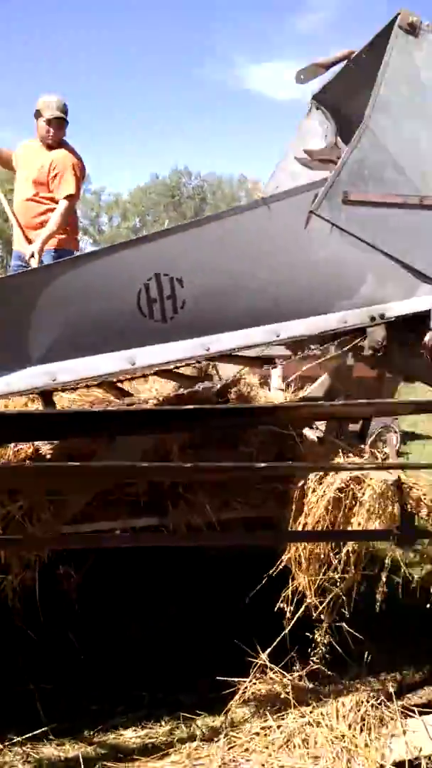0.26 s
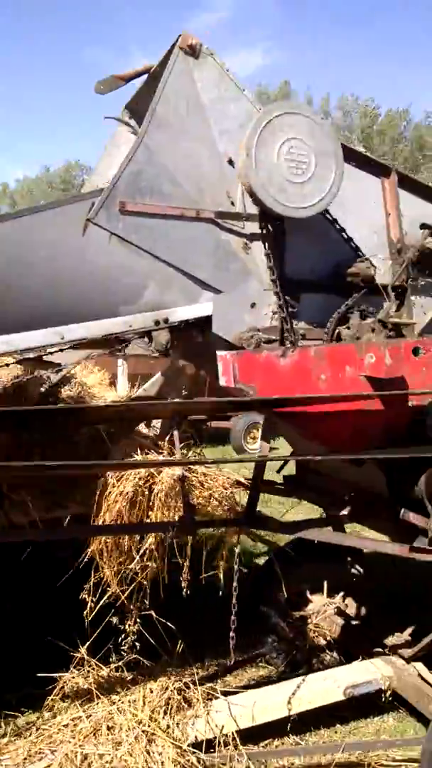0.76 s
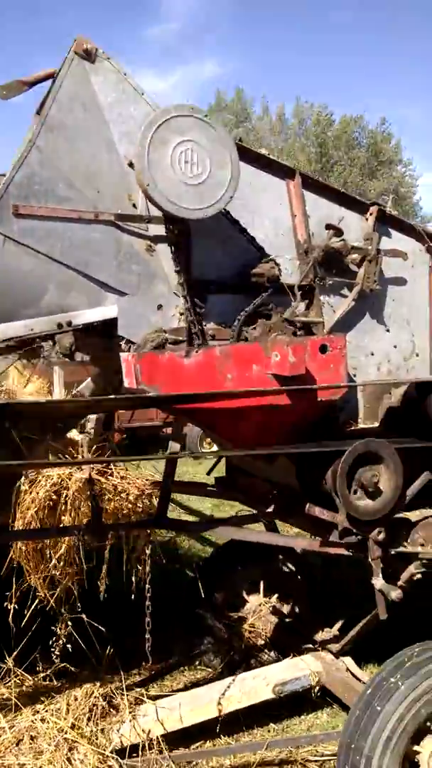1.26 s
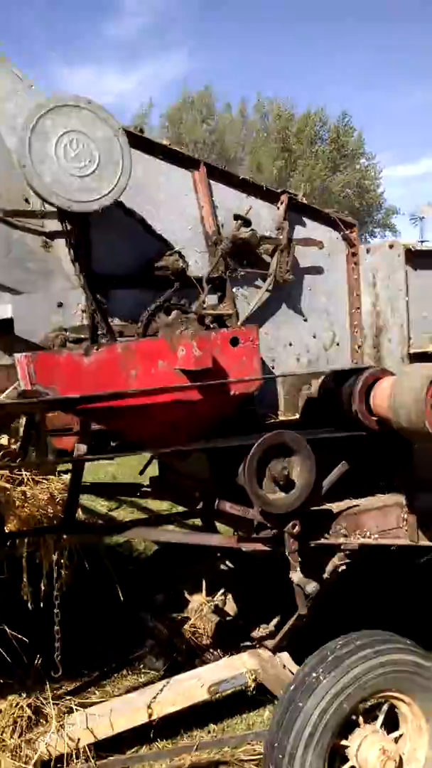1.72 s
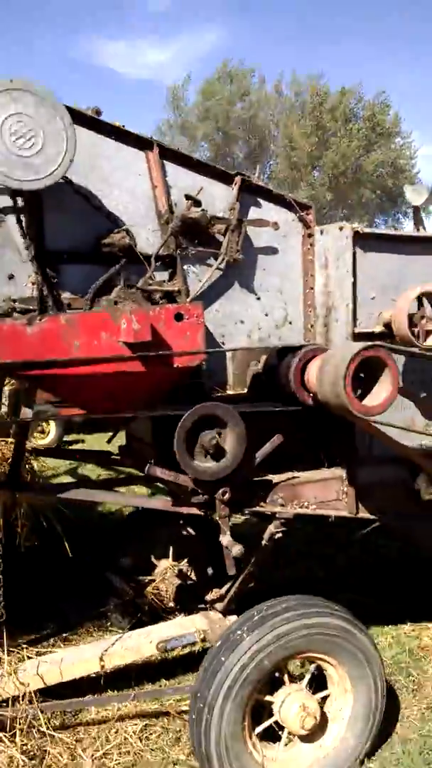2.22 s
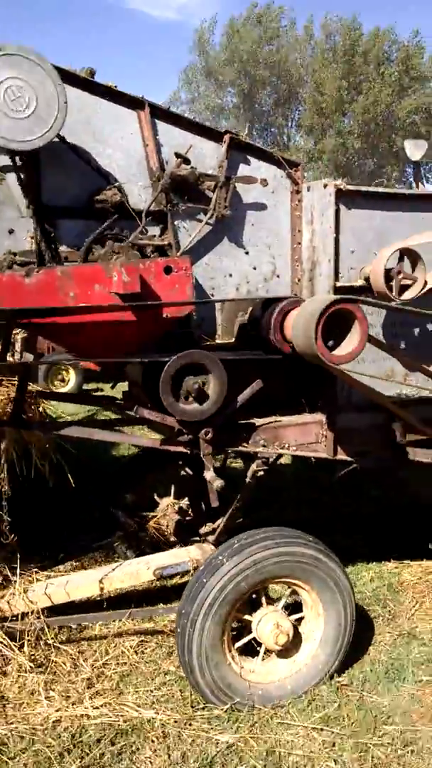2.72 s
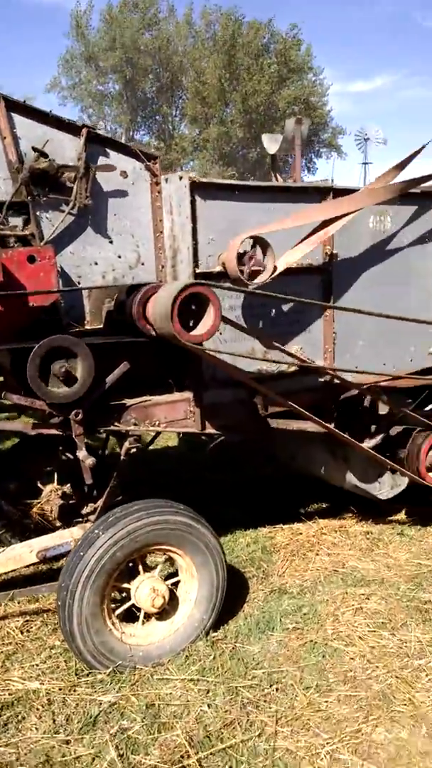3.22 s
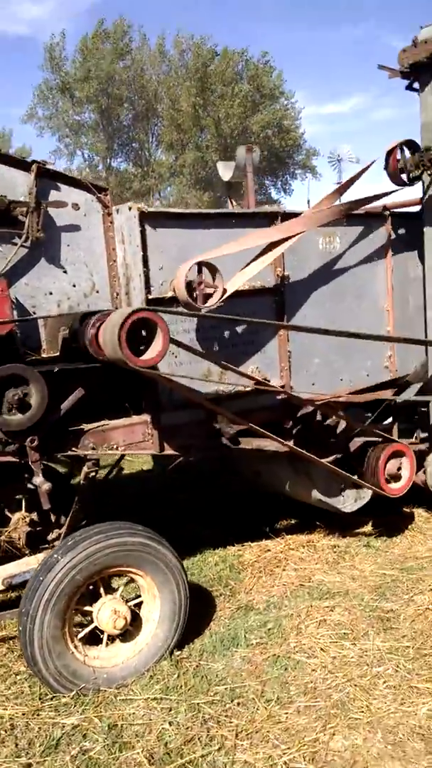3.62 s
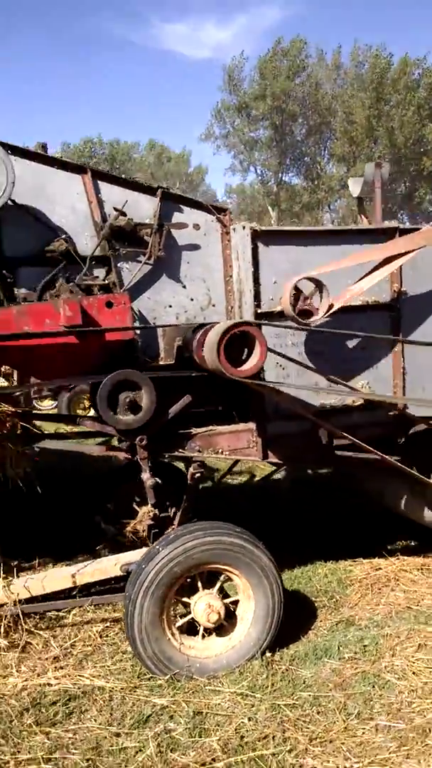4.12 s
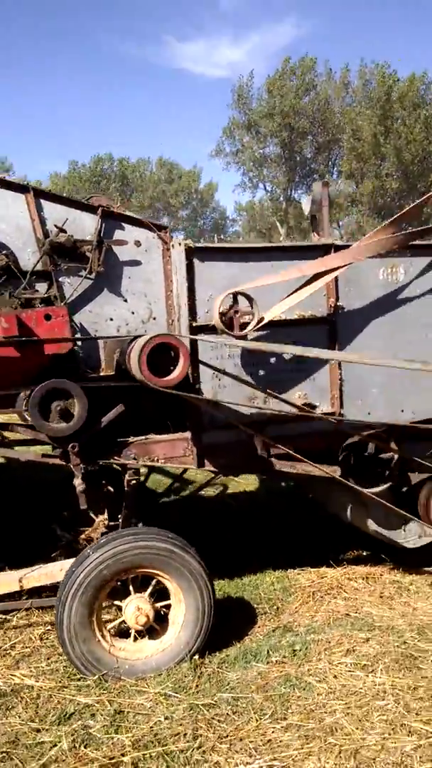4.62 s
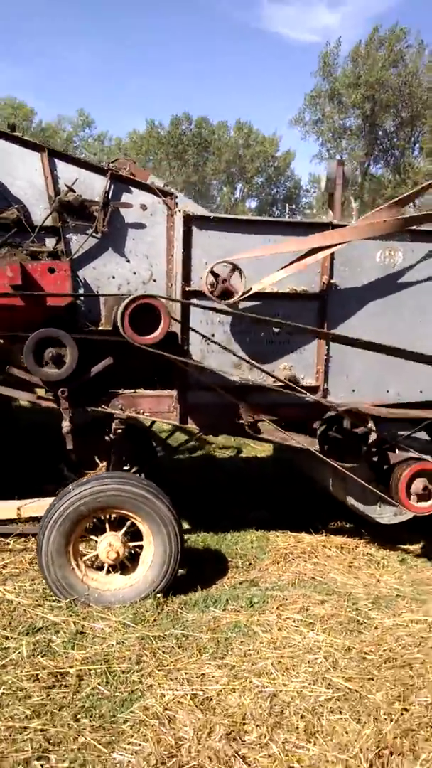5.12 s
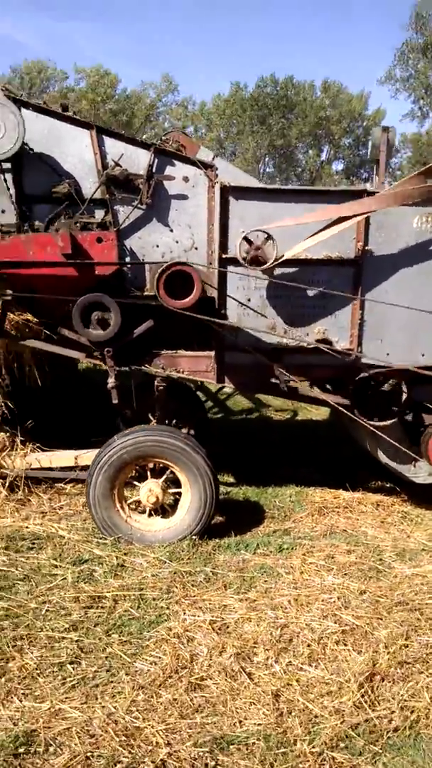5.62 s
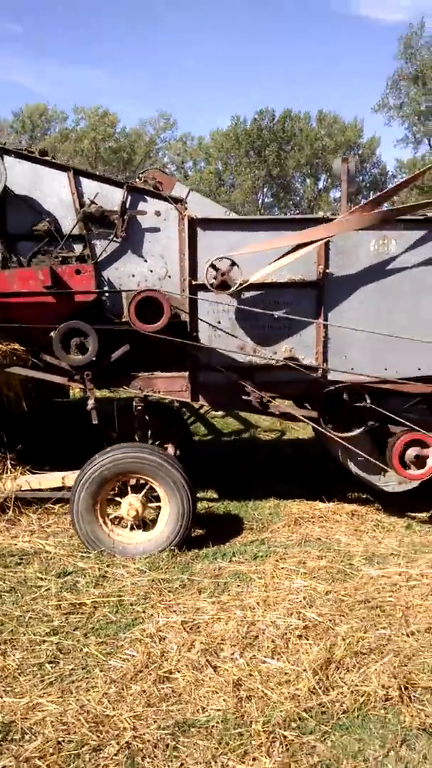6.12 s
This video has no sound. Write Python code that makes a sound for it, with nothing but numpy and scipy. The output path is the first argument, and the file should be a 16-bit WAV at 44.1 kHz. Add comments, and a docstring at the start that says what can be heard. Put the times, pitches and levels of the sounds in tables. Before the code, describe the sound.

A big belt-driven threshing machine runs close by outdoors: rough sheet-metal roar, bright chaff hiss, rattling tin and a low shaft hum. Wind pops hit the handheld stereo microphone early, and the machine dips and swells back. Around four seconds a heavy bundle chokes it with a sharp squeal, hammering and a short groan as the hum sags; thumps and pings follow, with more wind near the end.

```python
"""Threshing machine choking on a bundle

A belt-driven threshing machine runs outdoors beside a hand-held camera: filtered noise makes the sheet-metal din,
chaff hiss and rattling panels, sines the shaft hum, pings and ringing tin. Bundles thump; a heavy one slugs the
cylinder, which groans, hammers and sags in speed. Wind pops push the two microphone ports in opposite directions
and make the gain control duck the whole machine, which then swells back.
"""
import sys
import numpy as np
from scipy import signal
from scipy.io import wavfile
from scipy.ndimage import uniform_filter1d

SR = 44100
rng = np.random.default_rng(int(sys.argv[2]) if len(sys.argv) > 2 else 0)


def output_pcm(signal):
    """Save a mono or channel-first signal as 16-bit PCM at the path in sys.argv[1].

    Samples are clipped to [-1, 1] before scaling.
    """
    pcm = np.clip(np.atleast_2d(signal).T, -1, 1) * 32767
    wavfile.write(sys.argv[1], SR, np.round(pcm).astype(np.int16))


N = 280476  # samples

# how hard the machine is fed: (time [s], sheet-metal din [dB], chaff hiss [dB])
STRAW_LOAD = [(0, -20.5, -22.5), (.3, -21.5, -22.5), (.65, -18, -18), (1, -19.5, -17.5), (1.4, -18, -18.5),
              (1.9, -18, -18), (2.1, -20.5, -21), (2.5, -22, -20.5), (3, -22.5, -19.5),
              (3.45, -23.5, -20.5), (3.9, -21, -20), (4.3, -23.5, -22.5), (4.75, -24.5, -22.5),
              (5.05, -19, -19), (5.35, -24.5, -21.5), (5.85, -21, -21), (6.05, -24, -24.5),
              (6.36, -25.5, -23.5)]
# rattle of the feeder housing, strongest while the camera faces it: (time [s], level [dB])
FEEDER_LEVEL = [(0, 0), (.8, 3.5), (1.2, 10), (2, 4.5), (2.6, 4), (3.4, -0.5), (4.2, 0), (5, 1), (5.8, -3),
                (6.36, 3)]
BARS_PER_HUM = 3.5  # cylinder bars passing in one cycle of the shaft hum
GROAN_START_S, GROAN_RISE_S, GROAN_HOLD_S, GROAN_RELEASE_S = 3.89, 0.04, 0.25, 0.04


def amp(db):
    """Turns dB into gain."""
    return 10 ** (np.asarray(db) / 20)


def evened(x):
    """Scales a signal to rms 1."""
    return x / np.sqrt(np.mean(x ** 2) + 1e-20)


def read(points, hz):
    """Reads a curve over frequency on a logarithmic axis."""
    f, value = np.transpose(points)
    return np.interp(np.log(hz + 1), np.log(f + 1), value)


def column(table, order):
    """Reads one column of a time table at every sample."""
    rows = np.array(table)
    return np.interp(np.arange(N) / SR, rows[:, 0], rows[:, order])


def add(mix, s, sound):
    """Mixes a sound in at time s, cut at the end of the scene."""
    part = mix[..., round(s * SR):][..., :sound.shape[-1]]
    part += sound[..., :part.shape[-1]]


def ramp(start_s, length_s):
    """Climbs from 0 to 1."""
    return np.clip((np.arange(N) / SR - start_s) / length_s, 0, 1)


def drift(per_s):
    """Low-passed chance of rms 1; per_s is the cutoff in Hz."""
    low_pass = signal.butter(2, per_s, fs=SR, output="sos")
    settled = signal.sosfilt(low_pass, rng.standard_normal(N + SR))[SR:]
    return evened(settled)


def rush(spectrum, patchy_db, flicker_db, size=512):
    """Two unrelated noises that share drifting patches and a flicker across all bands."""
    frames, hz = 4 * N // size + 5, np.fft.rfftfreq(size, 1 / SR)
    a, b, c, d, patches = rng.standard_normal((frames, len(hz), 5)).T
    patches = evened(uniform_filter1d(uniform_filter1d(patches, size=8, axis=0), size=8, axis=1))
    flicker = evened(uniform_filter1d(rng.standard_normal(frames), size=5))
    level_db = read(spectrum, hz)[:, None] + patchy_db * patches + flicker_db * flicker
    bins = np.array([a + 1j * b, c + 1j * d]) * amp(level_db)
    return evened(signal.istft(bins, nperseg=size, noverlap=3 * size // 4)[1][:, :N])


def narrow_band(order, low_hz, top_hz):
    """Band-pass filter in second-order sections."""
    return signal.butter(order, [low_hz, top_hz], "bandpass", fs=SR, output="sos")


def speed():
    """Shaft hum in Hz: steady, dragged down by the heavy bundle, held low a moment, then regained."""
    run_hz, sag_hz = 57.52, 8.8
    slug_s, sag_s, held_s, regain_s = 3.895, 0.091, 0.408, 0.843
    since = np.maximum(np.arange(N) / SR - slug_s, 0)
    return run_hz - sag_hz * (1 - np.exp(-since / sag_s)) * (1 - ramp(slug_s + held_s, regain_s))


def turns():
    """Cycles of the shaft hum so far, wavering a little in speed."""
    return np.cumsum(speed() * (1 + 0.004 * drift(per_s=2.75))) / SR


def straw_db(order, surge_share, shake_db):
    """Level of one layer: slow load, surges of straw and the toss of the straw racks."""
    # mouthfuls of straw surging through: (time [s], rise of the din [dB])
    mouthfuls = [(.33, 1.5), (2.51, 3), (2.76, 2), (3.26, 1.5), (3.6, 1), (4.01, 4), (4.5, 2), (4.94, 2),
                 (5.44, 3.5), (5.61, 2)]
    surge_s = 0.052
    hums_per_shake, shake_turn = 10, 0.83  # one toss in so many hum cycles; its phase in turns
    t = np.arange(N) / SR
    surges = sum(db * np.exp(-((t - s) / surge_s) ** 2) for s, db in mouthfuls)
    shake = np.cos(2 * np.pi * (np.cumsum(speed()) / SR / hums_per_shake - shake_turn))
    return column(STRAW_LOAD, order=order) + surge_share * surges + shake_db * shake


def chaff_db():
    """Level of the chaff, which takes a smaller share of each surge than the din."""
    return straw_db(order=2, surge_share=0.73, shake_db=0.6)


def median_chaff_db():
    """Middle value of the chaff load table."""
    return np.median(np.array(STRAW_LOAD)[:, 2])


def groan(start_s, mutter_db, groan_db, sag_db_per_s):
    """Envelope of the cylinder bars: a mutter, then attack, sagging hold and release."""
    mutter_rise_s = 0.1
    hold_start_s = GROAN_START_S + GROAN_RISE_S
    held_db = groan_db + sag_db_per_s * GROAN_HOLD_S * ramp(hold_start_s, GROAN_HOLD_S)
    attack = ramp(GROAN_START_S, GROAN_RISE_S) ** 2
    mutter = amp(mutter_db) * ramp(start_s, mutter_rise_s)
    release = (1 - ramp(hold_start_s + GROAN_HOLD_S, GROAN_RELEASE_S)) ** 2
    return (mutter * (1 - attack) + amp(held_db) * attack) * release


def din():
    """The sheet-metal body roars: shaped noise, stirred by the clatter of loose parts."""
    # tone of the sheet metal: (frequency [Hz], relative density [dB per Hz])
    metal_spectrum = [(20, -31), (45, 0), (110, 0.5), (190, 0), (400, -4), (620, -1.5), (730, -2.5),
                      (830, -7), (980, -7), (1100, -4.5), (1350, -8), (1600, -9.5), (2100, -10.5),
                      (2600, -13), (3000, -11), (3500, -21.5), (6000, -29)]
    knocks = amp(1.5 * np.minimum(rng.exponential(1, N), 4)) * (rng.random(N) < 60 / SR)  # 60 a second
    clatter = signal.oaconvolve(knocks, np.exp(-np.arange(2000) / 520.0))[:N]
    level = amp(straw_db(order=1, surge_share=1.0, shake_db=0.5))
    roar = rush(metal_spectrum, patchy_db=0.58, flicker_db=0.65, size=1024)
    return level * (1 + 0.2 * evened(clatter)) * roar


def chaff(shaft):
    """Straw and grain hiss in the shakers, throbbing with each chain link; single kernels tick on the tin."""
    # tone of the chaff: (frequency [Hz], relative density [dB per Hz])
    chaff_spectrum = [(1500, -25), (3300, -6), (4200, -4.5), (4700, -2), (5300, 4.5), (6000, -4.5),
                      (7200, 1.5), (8500, -0.5), (10500, 2.5), (12000, 0.5), (14500, -0.5), (15500, -7.5)]
    links_per_hum = 0.84  # chain links passing in one cycle of the hum
    links = np.exp(-((links_per_hum * shaft) % 1) / 0.56)
    kernels = amp(3.5 * np.minimum(rng.exponential(1, N), 5)) * (rng.random(N) < 500 / SR)  # 500 a second
    ticks = signal.oaconvolve(kernels, np.exp(-np.arange(300) / 16.0))[:N]
    beat = 1 + 0.49 * links + 0.14 * evened(ticks)
    return amp(chaff_db()) * beat * rush(chaff_spectrum, patchy_db=1.5, flicker_db=0.7)


def tinkle():
    """Kernels and loose rivets ring small patches of tin, each a decaying sine at its own pitch."""
    patches, low_hz, top_hz = 30, 298.2, 13490
    hits_per_s, spread_db, level_db = 400, 3, -28.5
    db_per_octave, ring_cycles = -0.9, 130  # ring_cycles scales the decay time
    hits = amp(spread_db * np.minimum(rng.exponential(1, N), 4)) * (rng.random(N) < hits_per_s / SR)
    patch, t, out = rng.integers(0, patches, N), np.arange(1200) / SR, np.zeros(N)
    for k, hz in enumerate(np.geomspace(low_hz, top_hz, patches)):
        decay = np.exp(-t * np.sqrt(hz * 6000) / ring_cycles)
        ring = np.sin(2 * np.pi * hz * t) * decay * np.minimum(t / 0.0017, 1)
        fade_out = np.cos(np.pi / 2 * t / t[-1])
        ring = ring * fade_out * amp(db_per_octave * np.log2(hz / low_hz))
        out += signal.oaconvolve(hits * (patch == k), ring)[:N]
    load_db = column(STRAW_LOAD, order=2) - median_chaff_db()
    # only the first of the two sounds that ports() blends
    return amp(level_db + load_db) * evened(out) * np.array([[1], [0]])


def panels():
    """Loose panels ring in narrow bands, in bursts that follow the load; both ports hear mostly the same ring."""
    # ringing panels: (center [Hz], width [Hz], base level [dB], left minus right [dB], burstiness [dB],
    # share that follows the feeder [ratio])
    panel_rings = [(185.4, 43.6, -33.5, -4, 2, -0.12), (349.4, 78, -45.5, 2, -0.5, 1.6),
                   (2135, 59, -47.5, -9, 7, -0.24), (6610, 330, -37, -11.5, 2.5, -0.25)]
    hush_db = -6 * groan(0, -99, 0, 0)  # the panels fall quiet while the cylinder groans
    out = np.zeros((2, N))
    for hz, width, db, pan_db, burst_db, feeder_share in panel_rings:
        both, *own = rng.standard_normal((3, N))
        ring = signal.sosfilt(narrow_band(4, hz - width / 2, hz + width / 2), both + 0.27 * np.array(own))
        level_db = db + burst_db * drift(per_s=20.2) + feeder_share * column(FEEDER_LEVEL, order=1)
        out += evened(ring) * amp(level_db + hush_db) * amp([[pan_db / 2], [-pan_db / 2]])
    return out * amp(chaff_db() - median_chaff_db())


def feeder():
    """The feeder housing rattles: a narrow band of noise in quick bursts within longer bouts."""
    center_hz, width_hz, level_db = 2870, 380, -42
    band = narrow_band(3, center_hz - width_hz / 2, center_hz + width_hz / 2)
    ring = evened(signal.sosfilt(band, rng.standard_normal((2, N))))
    load_db = column(STRAW_LOAD, order=2) - median_chaff_db()
    bursts_db = 3 * drift(per_s=33.0) + 3.5 * drift(per_s=15.0)
    return ring * amp(level_db + column(FEEDER_LEVEL, order=1) + load_db + bursts_db)


def hum(shaft):
    """Shaft hum: harmonics locked to the shaft's turning, stronger at the right port."""
    # harmonics: (multiple of the hum [ratio], relative level [dB])
    hum_harmonics = [(1, -1), (2, -13)]
    # swell of the hum, before the overall gain of the tones: (time [s], level [dB])
    hum_level = [(0, -30), (.35, -21), (.7, -19.5), (1.05, -19.5), (1.4, -20.5), (1.75, -18.5), (2, -24),
                 (2.75, -25), (3.15, -20.5), (3.35, -28.5), (3.87, -23.5), (3.97, -39), (4.12, -21),
                 (4.38, -39), (4.55, -29), (4.8, -34), (5.04, -25.5), (5.7, -23.5), (6, -24), (6.36, -31)]
    port_phase = np.array([[1.1], [0]])  # radians
    tone = sum(amp(db) * np.sin(2 * np.pi * k * shaft + port_phase) for k, db in hum_harmonics)
    throb_db = 1.2 * drift(per_s=14)
    return tone * amp(column(hum_level, order=1) + throb_db) * amp([[-11], [0]])


def pings():
    """Short metal pings: each is a brief wavering tone; the highest smear into a squeak."""
    # pings and squeaks, before the port blend: (time [s], peak level [dB], frequency [Hz])
    metal_pings = [(0.14, -21, 6840), (2.122, -17, 11400), (2.439, -24, 6600), (2.749, -11.5, 6620),
                   (2.776, -15, 11550), (2.85, -21, 9000), (3.299, -10.5, 10560), (3.965, -11, 9700),
                   (3.974, -9, 11200), (3.978, -12, 12000), (3.988, -0.5, 11550), (4.489, -13, 9660),
                   (4.497, -20, 2540), (4.609, -12.5, 6580), (4.756, -18, 11100), (4.879, -17, 6750),
                   (4.933, -19, 6500), (5.091, -20, 11000), (5.24, -20, 2140), (5.835, -16, 11100),
                   (5.953, -10, 11150)]
    ping_s = 0.015
    out = np.zeros((2, N))
    for s, db, hz in metal_pings:
        waver = uniform_filter1d(rng.standard_normal((2, 1500)), size=60)[:, :round(ping_s * SR)]
        wavering_hz = hz * (1 + 0.38 * (hz / 11000) ** 2 * waver)
        tone = np.sin(2 * np.pi * np.cumsum(wavering_hz, axis=1) / SR)
        add(out, s, amp(db) * tone * np.hanning(tone.shape[1]))
    return out


def wind():
    """Pops push the two ports in opposite directions, then swing back; a low buffeting lies under them."""
    # wind pops, before decay and filtering: (time [s], push [dB], direction [sign])
    wind_pops = [(.4096, 2, 1), (.4195, 10, 1), (.4555, 16, 1), (.4632, 17, -1), (.5054, 14, 1),
                 (.5455, 15, 1), (.6363, 15, 1), (.6665, 10, 1), (.6865, 12.5, 1), (.6944, 13.5, 1),
                 (4.2692, -2, 1), (5.8754, 6, 1), (5.8838, 7, 1), (5.8924, 15.5, 1), (5.9356, 6.5, 1)]
    rise_s, push_fall_s, pull_fall_s = 0.0008, 0.0017, 0.0055
    lead_s = 0.00045  # a pop reaches the right port first
    out, t = np.zeros(N), np.arange(2000) / SR
    for s, db, direction in wind_pops:
        fall_s = push_fall_s if direction > 0 else pull_fall_s
        push = (1 - np.exp(-(t / rise_s) ** 2)) * np.exp(-t / fall_s)
        add(out, s, direction * amp(db) * push)
    out = signal.sosfilt(signal.butter(1, 14, "highpass", fs=SR, output="sos"), out)  # the swing back
    buffet = amp(-44.0 + 1.8 * drift(per_s=3.2)) * drift(per_s=30)
    both = np.array([out, np.roll(out, -round(lead_s * SR))]) + buffet
    return both * amp([[-1.2], [1.2]]) * [[1], [-1]]


def bundles():
    """Bundles strike the cylinder: a crunch of band-passed cracks and a decaying ring of the frame."""
    # strikes, before the port blend: (time [s], length [s], crunch [dB], top of the crunch [Hz], frame ring [dB])
    strikes = [(1.799, .03, -31, 400, -33), (2.553, 0.035, -23.5, 500, -34), (2.66, 0.042, -35, 400, -31),
               (3.285, 0.03, -22.5, 900, -24), (3.572, 0.031, -22, 900, -28), (3.63, .025, -23, 850, -29),
               (3.76, 0.033, -24, 900, -27), (3.885, 0.043, -22, 150, -25), (3.949, 0.029, -11, 750, -22),
               (4.268, 0.035, -19.5, 450, -19), (4.417, 0.016, -20, 465, -16),
               (4.495, 0.029, -29, 800, -27), (4.543, 0.026, -22, 497, -15), (4.677, 0.027, -16, 1180, -17),
               (4.797, 0.035, -22.5, 800, -17), (4.93, 0.03, -23, 905, -18), (5.04, 0.022, -30, 400, -23),
               (5.176, 0.027, -20.5, 600, -28), (5.222, 0.04, -19, 1476, -19),
               (5.408, 0.017, -22, 500, -22), (5.582, 0.017, -17.5, 1010, -22),
               (5.772, 0.02, -21, 704, -37), (5.815, .02, -24, 700, -28)]
    # modes of the frame: (frequency [Hz], relative level [dB], decay time [s])
    frame_modes = [(63, 2.5, 0.014), (319.5, 2, 0.0081), (632, -6.5, 0.0087)]
    out, t = np.zeros((2, N)), np.arange(4000) / SR
    thud = sum(amp(db) * np.sin(2 * np.pi * hz * t) * np.exp(-t / fall_s) for hz, db, fall_s in frame_modes)
    thud = thud * np.minimum(t / 0.0018, 1)
    for s, length_s, crunch_db, top_hz, ring_db in strikes:
        snaps = rng.standard_normal((2, round(length_s * SR))) ** 3  # stalks snap in sharp cracks
        crunch = evened(signal.sosfilt(narrow_band(2, 60, top_hz), snaps))
        add(out, s, amp(crunch_db) * crunch * signal.windows.tukey(snaps.shape[1], 0.35))
        add(out, s, amp(ring_db) * thud[None])
    return out


def clanks():
    """The tin housing clanks: band-passed noise with a quick onset and an exponential fall."""
    # clanks, before the envelope and port blend: (time [s], noise level [dB])
    housing_clanks = [(2.4927, -26), (3.1594, -20), (3.9474, -16), (3.9789, -18), (4.497, -34),
                      (5.241, -32), (5.5994, -30), (5.7848, -19)]
    fall_s = 0.038
    out, t = np.zeros((2, N)), np.arange(3000) / SR
    band = narrow_band(3, 1930, 3000)
    for s, db in housing_clanks:
        clank = evened(signal.sosfilt(band, rng.standard_normal((2, len(t)))))
        add(out, s, amp(db) * clank * np.minimum(t / 0.00086, 1) * np.exp(-t / fall_s))
    return out


def cylinder_bars(shaft):
    """The cylinder bars passing the grate mutter, then groan in a rough tone locked to the shaft."""
    # overtones: (multiple of the bar rate [ratio], relative level [dB])
    bar_overtones = [(2, 0), (3, -7), (4, -9), (5, -8), (6, -6)]
    bar_turns = BARS_PER_HUM * shaft + 0.02 * drift(per_s=40)  # straw makes the bars land unevenly
    overtones = sum(amp(db) * np.sin(2 * np.pi * k * bar_turns) for k, db in bar_overtones)
    bars = groan(3.45, mutter_db=-38, groan_db=-20, sag_db_per_s=-8) * np.sin(2 * np.pi * bar_turns)
    bars = bars + groan(3.77, mutter_db=-30, groan_db=-20.5, sag_db_per_s=-30) * overtones
    return bars * amp(1.6 * drift(per_s=35)) * amp([[-2.5], [1.5]])


def hammering(shaft):
    """Cracks of noise, one for each bar that meets the heavy bundle, swelling and dying away."""
    start_s, rise_s, fall_s, level_db = 3.915, 0.024, 0.042, -13.5
    crack_share = 0.38  # decay of a crack as a share of the bar spacing
    since = np.arange(N) / SR - start_s - rise_s
    swell = ramp(start_s, rise_s) ** 2 * np.exp(-np.maximum(since, 0) / fall_s)
    cracks = np.exp(-((BARS_PER_HUM * shaft) % 1) / crack_share) * rng.standard_normal((2, N))
    return amp(level_db) * swell * evened(signal.sosfilt(narrow_band(2, 200, 1250), cracks))


def whine():
    """A faint sine bends up and falls while the shaft is dragged down."""
    # path of the whine, before the port levels: (time [s], frequency [Hz], level [dB])
    whine_path = [(4.05, 900, -60), (4.1, 930, -36), (4.18, 985, -35), (4.23, 900, -32), (4.3, 770, -33),
                  (4.37, 700, -60)]
    tone = np.sin(2 * np.pi * np.cumsum(column(whine_path, order=1)) / SR)
    return amp(column(whine_path, order=2)) * tone * amp([[-3], [1]])


def smooth_chance(shape, bins, frames):
    """Chance of rms 1, smoothed over frequency bins and time frames."""
    across = uniform_filter1d(rng.standard_normal(shape), size=bins, axis=0)
    return evened(uniform_filter1d(across, size=frames, axis=1))


def ports(pair):
    """Blends two unrelated sounds so that the ports agree, oppose or lag by frequency; the lag wanders slightly."""
    # stereo image over time: (time [s], lag between ports [s], how sharply bands agree [ratio],
    # how sharply bands oppose [ratio])
    stereo_image = [(0, .000392, 1.5, 1.06), (.6, .000392, 1.6, 1.1), (1, .000395, 2.6, 1.3),
                    (1.8, .000395, 2.5, 1.35), (2.2, .000394, 2.2, 1.4), (2.6, .000391, 1.8, 2),
                    (3.4, .000388, 1.7, 2.4), (4.2, .00039, 1.75, 1.4), (5, .000387, 1.55, 1.55),
                    (5.4, .000381, 1.22, 3), (6.36, .000384, 1.2, 2.5)]
    # the camera body turns the right port further, most in the bass: (frequency [Hz], phase [rad])
    body_phase = [(100, .6), (200, 1.4), (500, 1.8), (800, 1.05), (1280, 0), (1900, -.2), (2400, .12),
                  (2900, .12), (3400, 0), (4100, 0), (4600, .3), (5400, .1), (6500, 0)]
    # part of the likeness heard as a pure lag: (frequency [Hz], share [ratio])
    lag_share = [(300, 1), (550, .3), (1100, 0), (1600, 0), (2000, .55), (2300, 0), (5500, 0), (7000, .5),
                 (9500, 1)]
    # left-right likeness: (frequency [Hz], likeness [ratio])
    port_likeness = [(50, .45), (200, .72), (600, .9), (1050, 1), (5520, 1), (5950, .4), (6600, .5),
                     (8500, .6), (10300, .85), (12300, .7), (15000, .7)]
    # balance where the ports are wholly unlike: (frequency [Hz], left minus right [dB])
    port_balance = [(60, -5), (200, -4.5), (700, -1), (1300, 4), (2000, -6), (2900, 10), (3500, -7),
                    (6500, 5.5), (9000, -2), (10500, -2.5), (14000, 0)]
    # greatest left-right opposition, before random flicker and limiting: (time [s], share [ratio])
    opposition_limit = [(0, 0.99), (.5, 1.06), (1, 0.91), (1.7, 0.93), (2.2, 0.87), (2.7, 1.3), (3.4, 1.19),
                        (4.1, 0.93), (4.6, 1.57), (5, 1.4), (5.4, 2.1), (5.8, 1), (6.36, 1.5)]
    band_rad_per_khz = 0.066  # half width of the band where the limit is lifted to full opposition

    hz, t, (a, b) = signal.stft(pair, SR, nperseg=1024, noverlap=768)
    at = np.minimum(t * SR, N - 1).astype(int)
    tall_hz = hz[:, None]
    lag = column(stereo_image, order=1)[at] * (1 + 0.012 * drift(per_s=6)[at])  # wanders at random
    phase = np.pi + 2 * np.pi * tall_hz * lag + read(body_phase, hz)[:, None]
    facing = np.cos(phase)  # above 0 the ports agree, below 0 they oppose
    share = np.clip(read(lag_share, hz), 0, 1)[:, None]
    oppose = column(stereo_image, order=3)[at] ** np.clip(tall_hz / 5000, 0.3, 1) ** 1.5
    sharpness = np.where(facing > 0, column(stereo_image, order=2)[at], oppose)
    fine_flicker = smooth_chance(phase.shape, bins=9, frames=6)
    broad_flicker = smooth_chance(phase.shape, bins=40, frames=7)

    # random flicker in how fully opposing bands cancel between left and right
    limit = np.clip(column(opposition_limit, order=1)[at] + 0.2 * broad_flicker, 0, 1)
    # rare random dips close the band of full opposition
    half_rad = band_rad_per_khz * tall_hz / 1000 * amp(2.5 * fine_flicker) * (broad_flicker > -1.9)
    limit = np.where(np.arccos(abs(facing)) < half_rad, 1, limit)
    taper = np.where((facing < 0) & (tall_hz < 3800), abs(facing) ** 0.32, 1)  # narrows the opposing bands
    firm = np.maximum(sharpness * amp(2.6 * fine_flicker), 1.08) * facing * taper
    firm = np.clip(firm, -limit, 1 - np.clip(0.052 * broad_flicker, 0, 1))

    like = (1 - share) * firm + share * np.exp(1j * phase)
    like = like * np.clip(read(port_likeness, hz), 0, 1)[:, None]
    apart = np.sqrt(np.clip(1 - abs(like) ** 2, 0, 1))
    tilt = amp(read(port_balance, hz)[:, None] * apart / 2)  # ports that agree fully are equally loud
    left, right = a * tilt, (like * a + apart * b) / tilt
    return signal.istft(np.array([left, right]), SR, nperseg=1024, noverlap=768)[1][:, :N]


def scene():
    """The machine through the ports, with panels, tones and wind added."""
    shaft = turns()
    machine = din() + chaff(shaft) + tinkle() + feeder() + pings() + bundles() + clanks() + hammering(shaft)
    tones = np.sqrt(2) * (hum(shaft) + cylinder_bars(shaft) + whine())
    return ports(machine) + panels() + tones + wind()


def record(dry):
    """Gain control falls within milliseconds and recovers slowly; overshoots clip; then the band limit."""
    power = signal.lfilter([1 / 180], [1, 1 / 180 - 1], (dry ** 2).mean(0))
    power_db = 10 * np.log10(power + 1e-12)
    rise_db = np.arange(N) * 12.1 / SR  # the held peak falls by 12.1 dB a second
    held_db = np.maximum.accumulate(power_db + rise_db) - rise_db
    over_db = np.maximum(held_db + 10.5, 0)  # threshold -10.5 dB
    over_db = signal.lfilter([1 / 60], [1, 1 / 60 - 1], over_db)
    clipped = np.clip(dry / amp(0.89 * over_db), -0.99, 0.99)  # 0.89 dB of cut for each dB over
    low_pass = signal.firwin(1023, 15500, window=("kaiser", 9), fs=SR)
    return signal.oaconvolve(clipped, low_pass[None], "same")


dry = scene()
out = record(dry)
output_pcm(out)
```